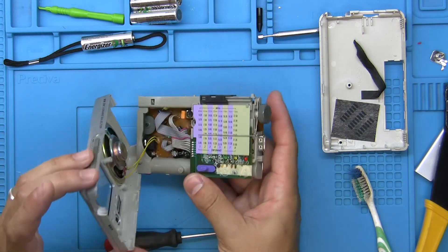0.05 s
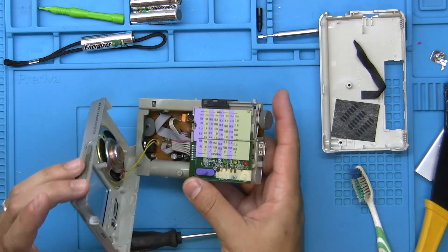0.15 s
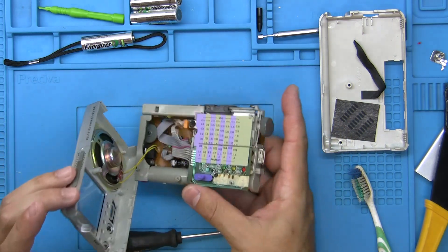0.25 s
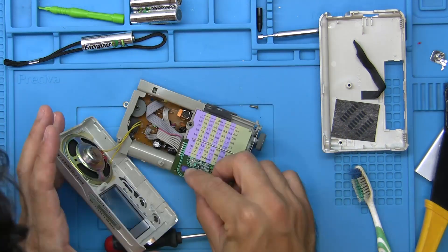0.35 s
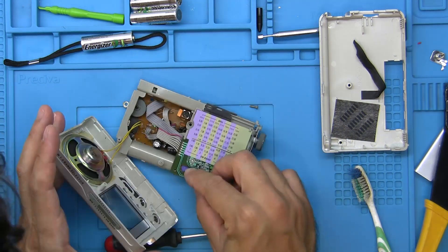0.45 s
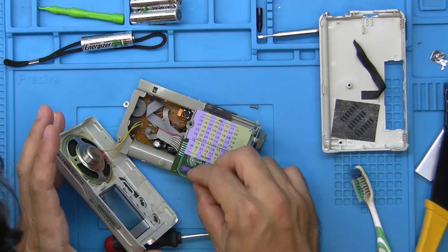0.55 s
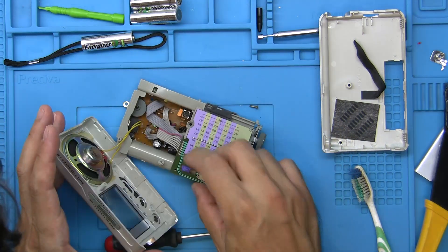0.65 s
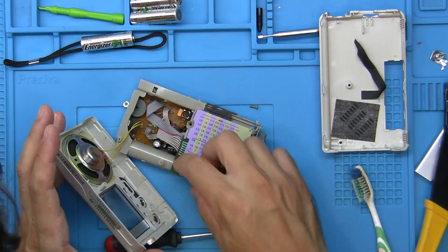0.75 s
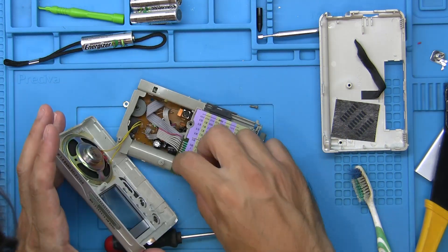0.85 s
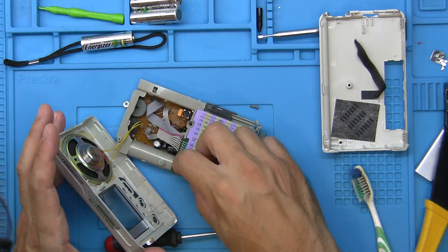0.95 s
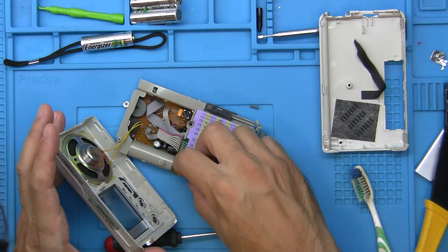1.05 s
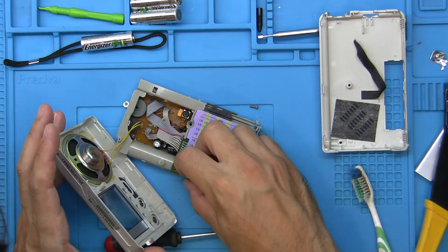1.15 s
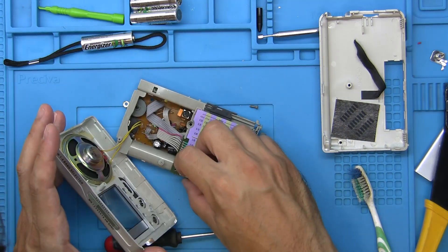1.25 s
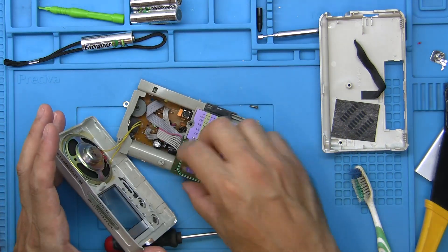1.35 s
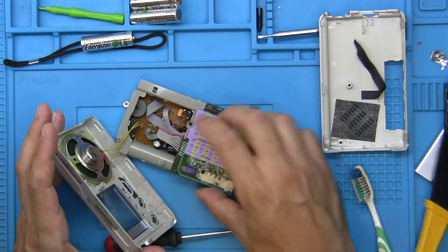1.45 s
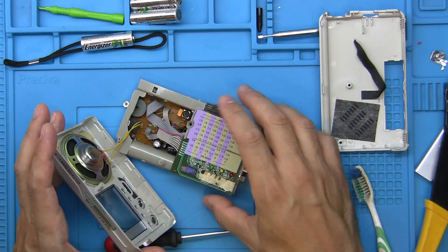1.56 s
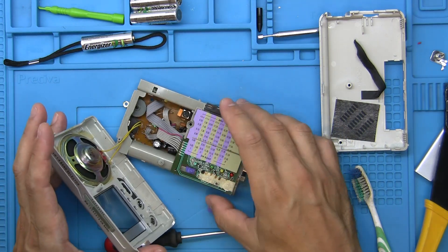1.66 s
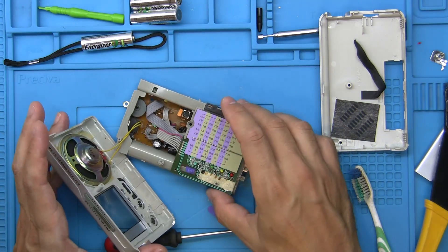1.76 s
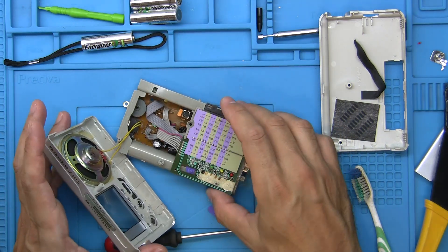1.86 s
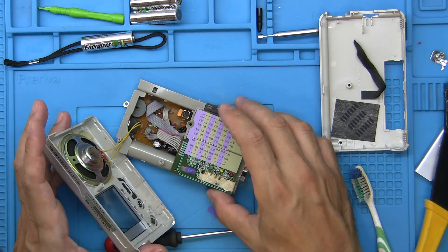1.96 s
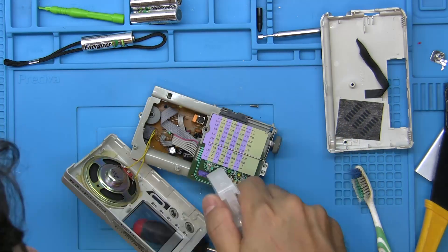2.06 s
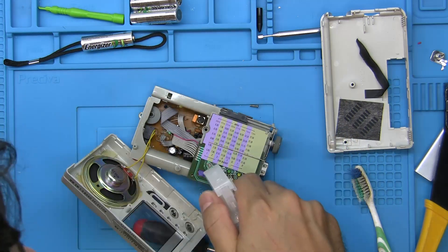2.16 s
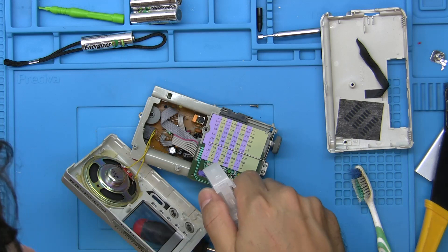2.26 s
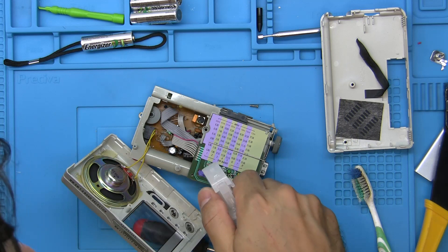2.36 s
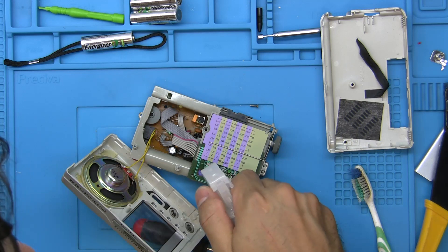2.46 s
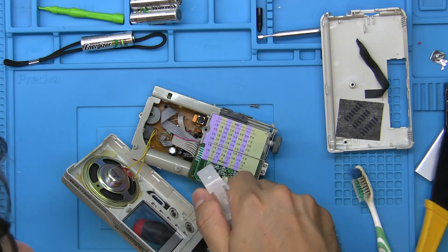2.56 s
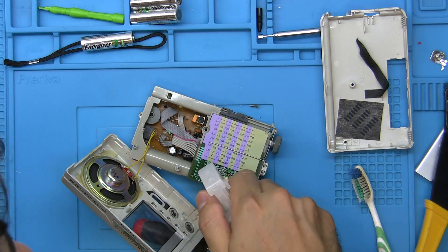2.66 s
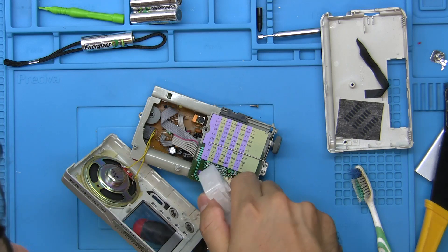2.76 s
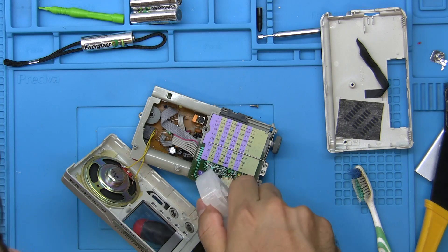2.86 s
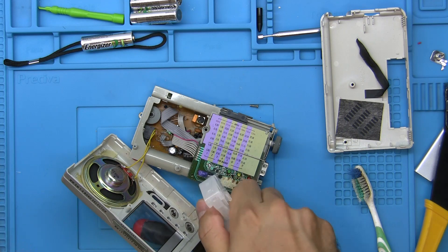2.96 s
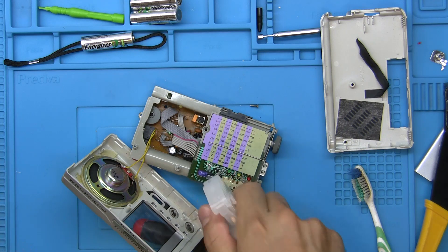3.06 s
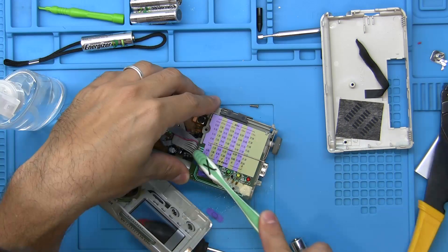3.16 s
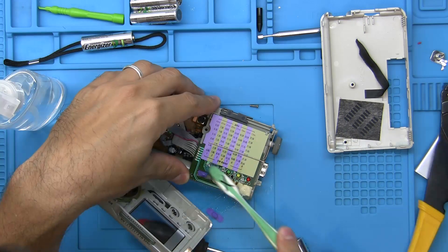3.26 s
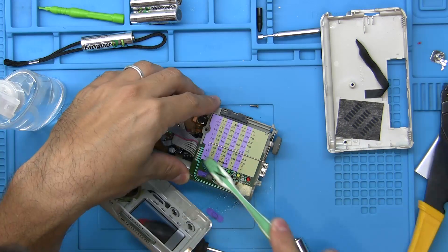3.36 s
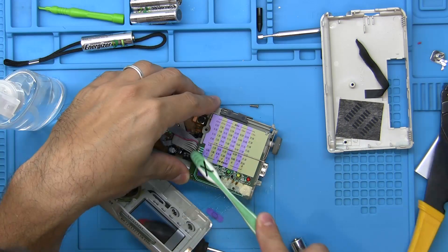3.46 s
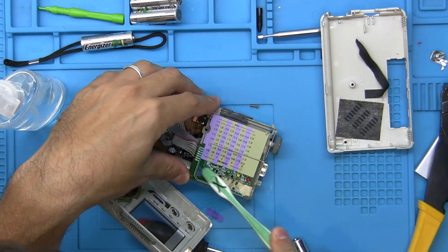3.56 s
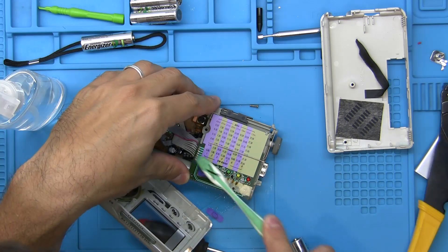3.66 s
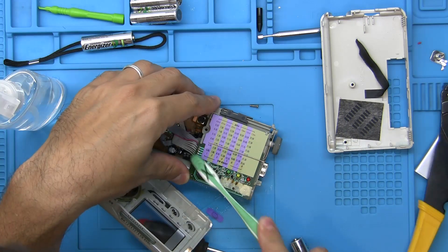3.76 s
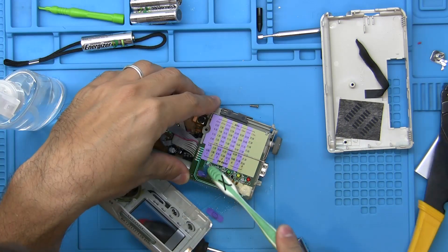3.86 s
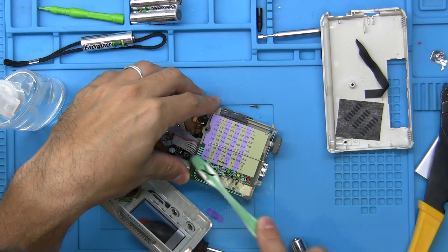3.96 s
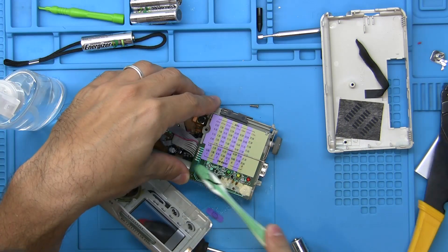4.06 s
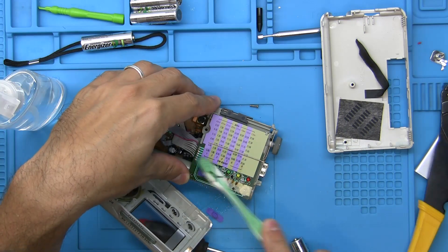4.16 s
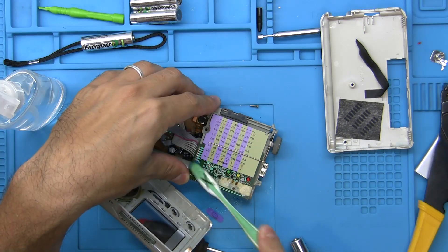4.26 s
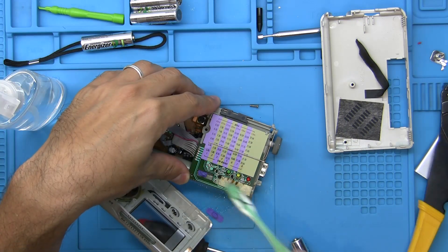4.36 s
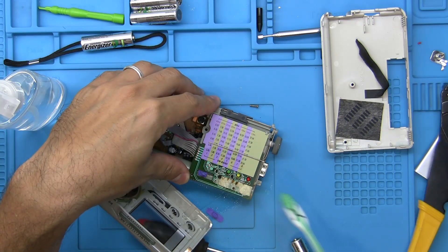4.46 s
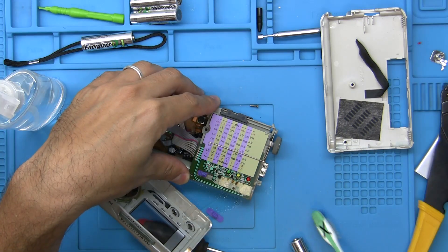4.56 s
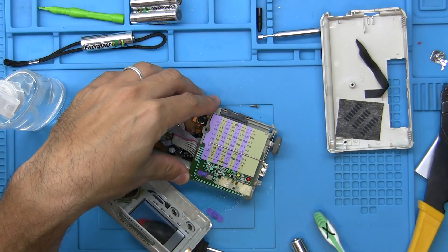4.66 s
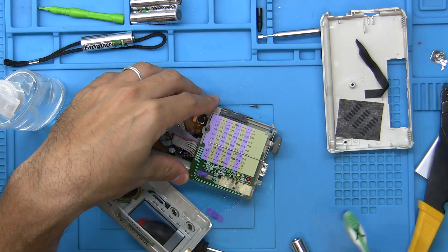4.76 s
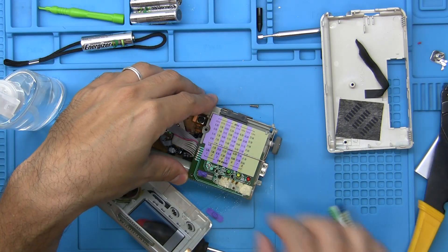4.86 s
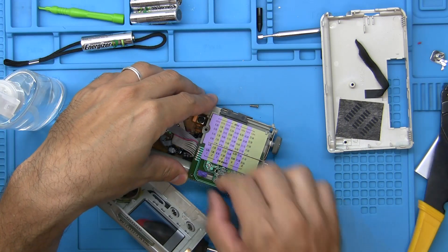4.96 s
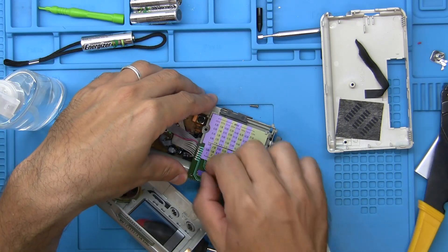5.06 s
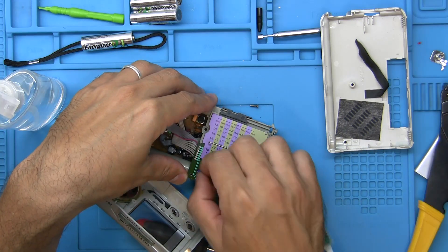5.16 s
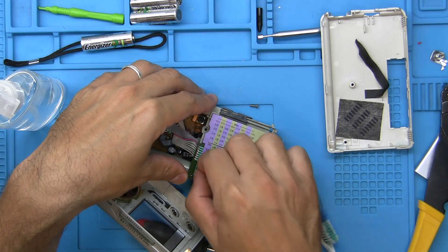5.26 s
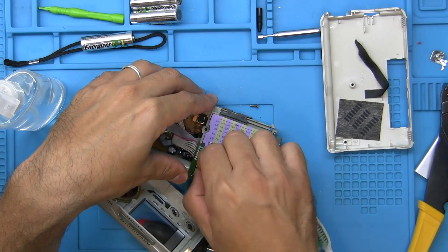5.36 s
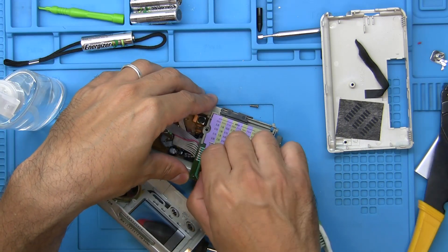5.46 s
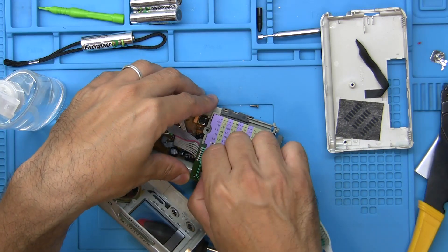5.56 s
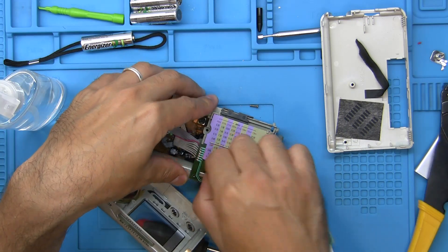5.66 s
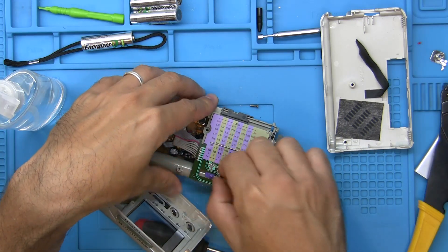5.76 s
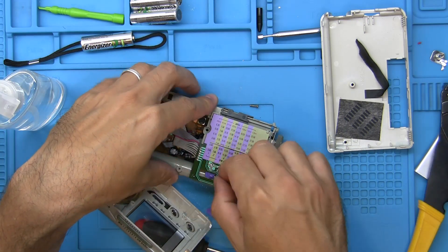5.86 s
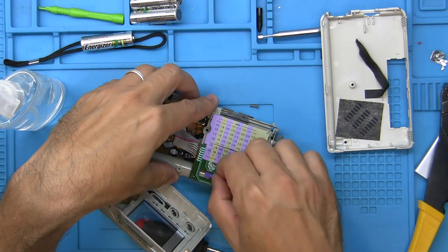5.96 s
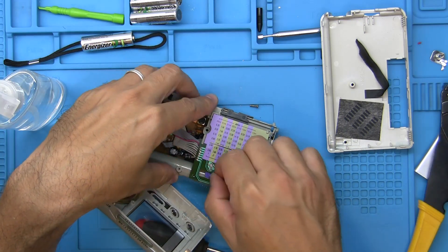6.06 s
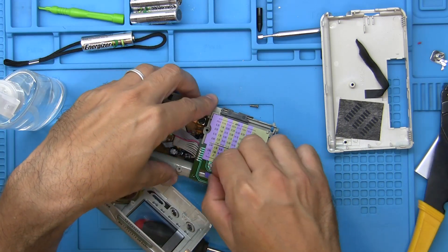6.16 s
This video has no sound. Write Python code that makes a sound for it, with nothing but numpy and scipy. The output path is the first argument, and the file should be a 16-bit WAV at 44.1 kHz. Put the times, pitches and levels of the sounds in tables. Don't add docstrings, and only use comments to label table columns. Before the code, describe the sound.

Close on a workbench in a softly humming room, fingers tap and handle a hollow plastic case, with low bench bumps. A small switch snaps crisply several times. Two very short squirts of cleaner hiss, then a toothbrush scrubs a circuit board in ten quick scratchy strokes with small clicks. A hard part drops with a loud, ringing knock farther off, bounces more and more softly, while the switch clicks again.

```python
import sys
import numpy as np
from scipy import signal
from scipy.io import wavfile
from scipy.ndimage import uniform_filter1d

SR = 44100
rng = np.random.default_rng(int(sys.argv[2]) if len(sys.argv) > 2 else 0)


def log_audio(samples):
    frames = np.atleast_2d(samples).T
    limited = np.clip(frames, -1, 1)
    pcm = np.round(limited * 32767).astype(np.int16)
    wavfile.write(sys.argv[1], SR, pcm)


def rack_gain(trim_db):
    fader = np.asarray(trim_db, float)
    return 10 ** (fader / 20)


N = 273728


def evened(x):
    return x / np.sqrt(np.mean(x ** 2) + 1e-20)


def unit(pair):
    return pair / np.linalg.norm(pair, axis=1, keepdims=True)


def read(points, hz):
    f, value = np.transpose(points)
    return np.interp(np.log(hz + 1), np.log(f + 1), value)


def add(mix, start_s, sound):
    part = mix[..., round(start_s * SR):][..., :sound.shape[-1]]
    part += sound[..., :part.shape[-1]]


def colour(x, points, tilt_db=0.):
    hz = np.abs(np.fft.fftfreq(4096, 1 / SR))
    db = read(points, hz) + tilt_db * np.log2((hz + 200) / 4000)
    log_gain = np.log(rack_gain(np.maximum(db, -100)))
    taps = np.fft.ifft(np.exp(log_gain - 1j * signal.hilbert(log_gain).imag)).real[:2048]
    taps = taps.reshape((1,) * (x.ndim - 1) + (-1,))
    return signal.oaconvolve(x, taps, axes=-1)[..., :x.shape[-1]]


def resonate(x, modes):
    out = np.zeros(x.shape)
    for hz, width_hz, db in modes:
        r = np.exp(-np.pi * width_hz / SR)
        pole = r * np.exp(2j * np.pi * hz / SR)
        out += rack_gain(db) * 2 * signal.lfilter([1 - r], [1, -pole], x).real
    return out


def wander(hz):
    return evened(signal.lfilter(*signal.butter(2, hz, fs=SR), rng.standard_normal(N)))


def swells(s, db, rise_db_s, fall_db_s):
    late_s = np.arange(N)[:, None] / SR - s
    return rack_gain((db + np.minimum(rise_db_s * late_s, -fall_db_s * late_s)).max(axis=1))


def rattle(noise, t60_s, crack):
    t = np.arange(len(noise)) / SR
    decay = rack_gain(-60 * t / max(t60_s, .003))
    burst = noise * decay * np.minimum(t / 0.00018, 1) + crack * (t == t[6])
    return np.array([burst, np.linalg.norm(burst) * (t == 0)])


# (frequency [Hz], t60 [s])
ROOM_T60 = [(150, 1), (400, 0.73), (1000, 0.43), (2700, 0.47), (7000, 0.45), (14000, 0.29)]
# (frequency [Hz], left-right likeness)
ROOM_LIKENESS = [(200, 0.94), (700, 0.82), (2000, 0.45), (8000, 0.071)]


def room(x, delay_s):
    taps = np.zeros((2, SR))
    at = np.arange(round(delay_s * SR), SR - 12, 10)
    at = at + rng.integers(0, 10, (2, len(at)))
    np.put_along_axis(taps, at, rng.choice([-1., 1.], at.shape), 1)
    hz, t, z = signal.stft(taps, SR, nperseg=256)
    same = np.clip(read(ROOM_LIKENESS, hz), 0, 1)[:, None]
    z[1] = same * z[0] + np.sqrt(1 - same ** 2) * z[1]
    decay = rack_gain(-60 * t / read(ROOM_T60, hz)[:, None])
    tail = signal.istft(z * decay, SR, nperseg=256)[1]
    return signal.fftconvolve(x[None], unit(tail), axes=1)[:, :N]


# (frequency [Hz], density [dB per Hz])
AIR_SPECTRUM = [(15, -66), (25, -3), (50, -11), (70, -37), (82, -10.5), (102, -11), (127, -6.5), (195, -7),
                (270, -7), (394, -8.5), (887, -16), (2000, -22), (2550, -28.5), (3080, -30), (16000, -51)]
# (frequency [Hz], left-right likeness)
AIR_LIKENESS = [(60, 0.37), (130, -0.084), (290, -0.25), (640, -0.12), (1410, -0.32), (3100, -0.5),
                (6820, -0.36), (15000, -0.0035)]


def air():
    frames, hz = N // 512 + 5, np.fft.rfftfreq(2048, 1 / SR)
    a, b, c, d, patches = rng.standard_normal((frames, 1025, 5)).T
    patches = uniform_filter1d(patches, size=20, axis=0)
    patches = evened(uniform_filter1d(patches, size=6, axis=1))
    same, left = np.clip(read(AIR_LIKENESS, hz), -1, 1)[:, None], a + 1j * b
    z = np.array([left, same * left + np.sqrt(1 - same ** 2) * (c + 1j * d)])
    z *= rack_gain(read(AIR_SPECTRUM, hz)[:, None] + 1.56 * patches)
    noise = signal.istft(z, nperseg=2048, noverlap=1536)[1][:, :N]
    return rack_gain(-48.5) * evened(noise)


# (frequency [Hz], level [dB], waver [Hz])
HUM_TONES = [(48.2, -65, 0.45), (100, -52.5, 0.35), (153.6, -64, 3.68), (195.5, -53, 1.86),
             (234.5, -67.5, 1.5), (320.6, -68.5, 1.5), (412, -68, 1.1)]


def hum():
    out, port_phase = np.zeros((2, N)), np.array([[0], [.3]])
    for hz, db, waver_hz in HUM_TONES:
        turns = np.cumsum(hz + waver_hz * wander(3.07)) / SR
        level = np.sqrt(2) * rack_gain(db + 0.78 * wander(4.5))
        out += level * np.sin(2 * np.pi * turns + port_phase)
    return out


# (time [s], pitch [Hz], peak [dB], t60 [s])
PART_PINGS = [(.002, 1043, -45.5, 0.12), (.09, 141, -42, 0.76), (.105, 540, -40.5, .11),
              (1.859, 4060, -52.5, .02), (2.013, 3950, -56, 0.018), (2.9993, 4240, -36, .02),
              (3.0012, 650, -34.5, .04), (3.168, 2330, -37, .023), (3.180, 2440, -41, 0.023),
              (3.178, 297, -40, 0.075), (3.191, 2270, -47, .028), (3.497, 2100, -38, .012),
              (4.692, 4020, -55, .023), (5.786, 2000, -53, .036), (6.160, 4070, -54, .018)]


def pings():
    out, t = np.zeros(N), np.arange(3000) / SR
    for s, hz, db, t60_s in PART_PINGS:
        envelope = rack_gain(db - 60 * t / t60_s) * np.minimum(t / 0.00039, 1)
        add(out, s, envelope * np.sin(2 * np.pi * hz * t))
    return out


# (time [s], peak [dB])
SKIN_RUBS = [
    (.01, -51),
    (.11, -51.5),
    (.35, -54),
    (1.24, -57.5),
    (1.69, -59),
    (2.0, -62.5),
    (5.548, -54),
    (5.818, -54.5),
    (6.1, -62),
]
# (frequency [Hz], density [dB per Hz])
SKIN_SPECTRUM = [(500, -7), (1500, -3), (4000, -14.5), (9000, -27), (15000, -35)]


def rubs():
    rough = rng.standard_normal((2, N)) * rack_gain(1.4 * wander(80.0))
    rustle = evened(colour(rough, SKIN_SPECTRUM))
    return rustle * swells(*np.transpose(SKIN_RUBS), rise_db_s=72, fall_db_s=43)


# (time [s], drone [dB], rumble [dB])
BENCH_JOLTS = [
    (.02, -49, -46.5),
    (.30, -54, -52),
    (.42, -47, -47.5),
    (1.08, -47.5, -59),
    (1.26, -56, -48),
    (1.69, -53, -53),
    (1.89, -52, -51.5),
]


def jolts():
    s, drone_db, rumble_db = np.transpose(BENCH_JOLTS)
    low = signal.lfilter(*signal.butter(2, [110, 450], "band", fs=SR), rng.standard_normal((2, N)))
    rumble = evened(low + 0.37 * low[::-1]) * swells(s, rumble_db - 3.5, rise_db_s=300, fall_db_s=36)
    drone = np.sin(2 * np.pi * np.cumsum(61.5 + 1.74 * wander(1.6)) / SR)
    drone = drone * swells(s, drone_db, rise_db_s=300, fall_db_s=31)
    return (drone + rumble) * (np.arange(N) / SR < SCENE_CHANGES[1])


# (time [s], peak [dB], case thud [dB], treble
# [dB])
FINGER_TAPS = [(.0702, -43, -8, -22), (0.101, -43.5, 6, -60), (.1244, -46.5, 7, -28), (.3310, -55, -12, -4),
               (.3620, -55, -15, -5), (0.4407, -36.5, -14, -31), (0.4486, -43, -8, -5),
               (0.6567, -58, 0, -5), (0.6883, -51.5, -5, -10), (0.7798, -49.5, -12, -10),
               (1.4614, -45.5, -1, -13), (1.7744, -53, 3, -10), (2.5379, -38, -9, 18),
               (2.67, -50, -19, -17), (3, -30.5, -12, -10), (3.0018, -37, -0.5, -19),
               (3.1376, -38, -9, -19), (5.5164, -39, -7, -24), (5.5574, -42.5, -2, -19),
               (5.709, -55, -1, -2), (5.7866, -41, -10, -20)]
# (time [s], peak [dB], treble [dB], rattle t60 [s], pitch [Hz])
SWITCH_SNAPS = [(1.0227, -22.5, -9.5, 0.027, 3460), (1.0254, -28.5, -12, .018, 3360),
                (1.244, -35, -25, 0.023, 3600), (1.2486, -30.5, -18.5, .02, 3700),
                (1.2515, -31.5, -21, 0.023, 3180), (1.4367, -30.5, -21, 0.017, 3460),
                (1.6651, -40, -13, 0.024, 3900), (5.473, -27.5, -14, 0.019, 2240),
                (5.6092, -36, -25, 0.013, 3380), (5.6134, -40, -15, .02, 3360),
                (5.6208, -37, -22, 0.023, 3380), (5.6236, -34, -20, 0.026, 3320)]
# (time [s], peak [dB], rattle t60 [s], pitch [Hz])
BRUSH_CATCHES = [
    (3.2665, -32, 0.029, 3130),
    (3.4793, -24.5, 0.01, 5900),
    (3.4974, -42.5, .025, 3120),
    (3.6315, -36.5, 0.031, 9870),
    (4.0472, -34, 0.018, 5960),
    (4.2072, -33.5, .034, 8430),
    (4.365, -31.5, 0.019, 3390),
]


def click_rows():
    snaps = [(s, db, -13, treble_db, t60_s, hz, 6) for s, db, treble_db, t60_s, hz in SWITCH_SNAPS]
    taps = [(*row, 0.026, 3240, 1) for row in FINGER_TAPS]
    catches = [(s, db, -15, -9, t60_s, hz, 1) for s, db, t60_s, hz in BRUSH_CATCHES]
    return sorted(snaps + taps + catches)


# (frequency [Hz], width [Hz], level [dB])
BOARD_MODES = [(3730, 1300, -3.5), (2350, 1100, -9), (6300, 580, -1.5), (8960, 1340, 0), (11600, 1500, -12)]
# (frequency [Hz], width [Hz], level [dB])
CASE_MODES = [(600, 52, 1), (720, 670, -8.5), (1200, 360, -6), (1760, 250, -3.5)]


def clicks():
    out, rows = np.zeros((2, N)), click_rows()
    noises = rng.standard_normal((len(rows), 3000))
    for (s, db, thud_db, treble_db, t60_s, hz, ring_db), noise in zip(rows, noises):
        snap = rattle(noise, t60_s, crack=2.9)
        ring = resonate(snap, [(hz, 350, 0)]) * rack_gain([[ring_db], [2.5]])
        board = resonate(snap, BOARD_MODES) + 0.39 * snap + ring
        board = colour(board, [(1500, -17.0), (2600, 7.5), (4500, 2.0), (8000, treble_db + 12.0),
                               (11500, treble_db + 7.5), (15500, treble_db + .1)])
        thud = resonate(snap, CASE_MODES)
        thud = colour(thud, [(2500, 2), (4500, 2.5), (7000, -32.0)])
        longer = np.sqrt(t60_s / 0.03)
        add(out, s, rack_gain(db + 15.0) * longer * (unit(board) + rack_gain(thud_db + 5.0) * unit(thud)))
    return out


# (time [s], length [s], level [dB], tilt [dB per octave])
SPRAY_BURSTS = [
    (2.537, 0.061, -46, -1),
    (3.024, 0.059, -42.5, -0.5),
]
# (frequency [Hz], density [dB per Hz])
JET_SPECTRUM = [(880, -41), (1500, -13), (2340, -7), (2690, -13), (3590, -9), (4690, -12), (16000, -16.5)]


def spray():
    out = np.zeros(N)
    for s, length_s, db, tilt_db in SPRAY_BURSTS:
        u = np.linspace(0, 1, round(length_s * SR))
        jet = evened(colour(rng.standard_normal(8000), JET_SPECTRUM, tilt_db))[:len(u)]
        add(out, s, rack_gain(db - 11.0 * u) * jet * signal.windows.tukey(len(u), .2))
    return out


# (time [s], length [s], pressure [dB], peak place [0-1], brightness [dB per octave])
BRUSH_STROKES = [
    (3.2, 0.07, -43, 0, -2.5),
    (3.333, 0.11, -46.5, 0.16, -1.5),
    (3.453, .14, -46.5, 0.28, -2),
    (3.61, 0.17, -48, .08, 0),
    (3.754, 0.12, -47, 0.21, -2),
    (3.892, 0.13, -47, 0.08, -0.5),
    (4.028, 0.11, -47.5, 0.21, -1),
    (4.126, 0.13, -46.5, .35, 0),
    (4.243, .17, -48, 0.21, -1),
    (4.349, 0.13, -45, 0.67, 0.9),
]
# (frequency [Hz], density [dB per Hz])
BRISTLE_SPECTRUM = [(500, -23), (900, -13.5), (2500, -7.5), (5000, -9.5), (7500, -11), (11000, -10),
                    (13000, -8.5), (15600, -13)]
# (frequency [Hz], width [Hz], level [dB])
BRUSHED_MODES = [(3300, 520, -2), (8900, 900, -3), (10600, 1300, -5), (1900, 400, -12)]
# (frequency [Hz], width [Hz], level [dB])
LID_MODE = (6100, 1400, -6)


def brush():
    out = np.zeros(N)
    for s, length_s, db, peak, bright_db in BRUSH_STROKES:
        u = np.linspace(0, 1, round(length_s * SR))
        peak = np.clip(peak, .1, .9)
        swell = np.sin(np.pi / 2 * np.minimum(u / peak, (1 - u) / (1 - peak)))
        grip = 1 + .045 * rng.standard_normal(len(BRUSHED_MODES))
        modes = [(hz * g, width_hz, d) for (hz, width_hz, d), g in zip(BRUSHED_MODES, grip)]
        modes.append(np.add(LID_MODE, [0, 0, -4 - 4 * bright_db]))
        shape = (1 + len(modes), 8000)
        ticks = rng.standard_normal(shape) * rack_gain(2.6 * np.minimum(rng.exponential(1, shape), 5.0))
        ticks *= rack_gain(3.5 * evened(uniform_filter1d(rng.standard_normal(shape), size=250)))
        drive = colour(ticks, BRISTLE_SPECTRUM, bright_db)
        ringing = sum(resonate(d, [mode]) for d, mode in zip(drive[1:], modes))
        scratch = evened(evened(drive[0]) + 1.4 * evened(ringing))
        add(out, s, rack_gain(db) * swell * scratch[:len(u)])
    return out


# (frequency [Hz], level [dB])
HARD_SPECTRUM = [(900, 0), (2200, -1), (3000, -2.5), (4000, -4), (6000, 2), (10000, 7)]


def landing_spectrum(soft):
    edge_hz = 4300 + soft * (2240 - 4300)
    return [(hz, db - 28 * soft / (1 + (edge_hz / hz) ** 8.4)) for hz, db in HARD_SPECTRUM]


# (frequency [Hz], level [dB], t60 [s])
FLOOR_MODES = [(214, -1.5, 0.26), (443, -4.5, 0.49), (509, 1, 0.29), (785, -1.5, 0.35), (821, -1.5, 0.32),
               (985, -22, 0.57), (1170, 4.5, 0.15), (1380, -10, 0.28), (1393, -0.5, 0.23), (1614, 8, 0.13),
               (1907, -14, 0.22), (1927, -9, 0.4), (2058, -10, 0.27), (2205, -18, 0.4)]


def floor_ring(softness, spot_hz, phase_turns):
    t, ring = np.arange(SR // 2) / SR, 0
    for (hz, db, t60_s), turns in zip(FLOOR_MODES, phase_turns):
        spot_db = 4.5 * np.exp(-(np.log2(hz / spot_hz) / 0.23) ** 2)
        level = rack_gain(db + read(softness, hz) + spot_db - 60 * t / t60_s)
        ring = ring + level * np.sin(2 * np.pi * (hz * t + turns))
    return ring * np.minimum(t / 0.0065, 1)


# (time [s], peak [dB], softness [0-1], ring [dB], landing spot pitch [Hz])
PART_BOUNCES = [
    (4.8205, -36, 0.47, -18, 800),
    (4.830, -6.5, 0.02, -8, 1150),
    (5.073, -15, 0.63, -6, 810),
    (5.097, -22, 0.48, -26, 1600),
    (5.289, -35.5, 0.71, 2, 520),
    (5.481, -37, 0.99, 1.5, 814),
    (5.716, -40, 1, 3.5, 425),
    (5.8456, -43.5, 0.94, 1.5, 800),
]
# (frequency [Hz], density [dB per Hz])
BLOW_SPECTRUM = [(100, -32), (210, -16), (330, -13), (450, -10.5), (620, -12), (800, -5.5), (1200, -3),
                 (1900, 0), (2900, -6.5), (4700, -9.5), (5600, -20.5), (9000, -38), (14000, -57)]
# (frequency [Hz], level [dB])
BEAM_SPECTRUM = [(3000, 1), (5000, 8), (10000, 9), (15000, 9)]


def bounces():
    blows, rings = np.zeros((2, N)), np.zeros(N)
    phase_turns = rng.random(len(FLOOR_MODES))
    noises = rng.standard_normal((len(PART_BOUNCES), 2048))
    for (s, db, soft, ring_db, spot_hz), noise in zip(PART_BOUNCES, noises):
        softness = landing_spectrum(soft)
        blow = colour(rattle(noise, 0.012, crack=1.4), BLOW_SPECTRUM)
        blow = rack_gain(db + 14.0) * unit(colour(blow, softness))
        add(blows, s, blow)
        add(blows[0], s + .0155, colour(blow[0], [(2000, -8.0), (6000, -9.0)]))
        add(rings, s, rack_gain(db + ring_db - 10.0) * floor_ring(softness, spot_hz, phase_turns))
    direct = colour(blows[0], BEAM_SPECTRUM) * rack_gain([[-1.2], [1.2]])
    return direct + rings + rack_gain(9.5) * room(blows[1], 0.003014)


def scene():
    near, echoed = clicks() + pings()
    hiss = spray() + brush()
    bench = (near + hiss) * rack_gain([[-.4], [.4]]) + room(rack_gain(-1.5) * echoed + hiss, .005)
    return air() + hum() + rubs() + jolts() + bench + bounces()


def top_cut(x):
    return signal.sosfilt(signal.butter(12, 16790, fs=SR, output="sos"), x)


SCENE_CHANGES = [
    .400,
    2.101,
    3.202,
]


def record(dry):
    t, fade_s = np.arange(N) / SR, .011
    fade = np.prod([np.minimum(abs(t - s) / fade_s + 0.11, 1) for s in SCENE_CHANGES], axis=0)
    ports = signal.lfilter(*signal.butter(2, 30., "high", fs=SR), dry) * rack_gain([[-.3], [.3]])
    band_limit = signal.firwin(511, 15900, window=("kaiser", 5), fs=SR)
    mix = signal.oaconvolve(ports * fade, band_limit[None], "same")
    return top_cut(mix)


dry = scene()
out = record(dry)
log_audio(out)
```